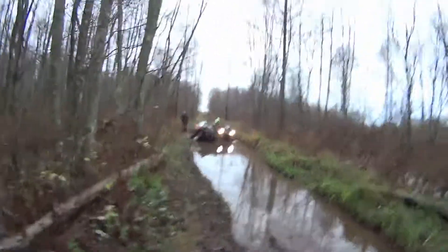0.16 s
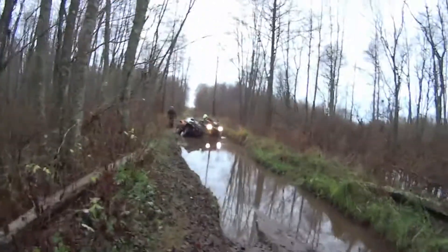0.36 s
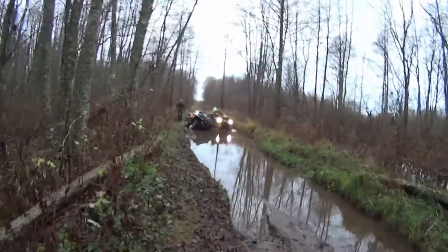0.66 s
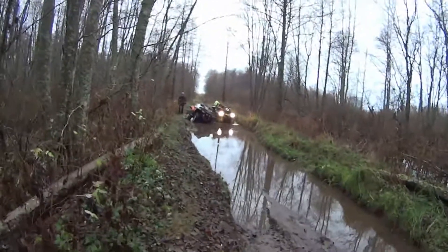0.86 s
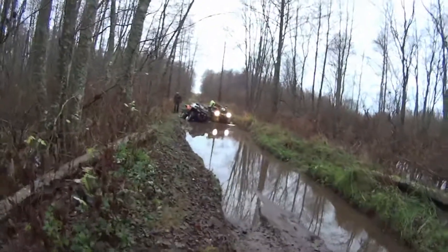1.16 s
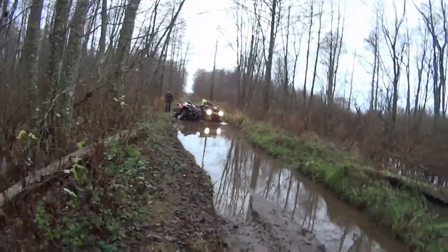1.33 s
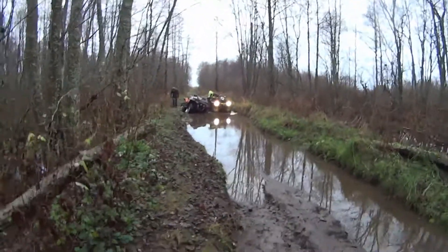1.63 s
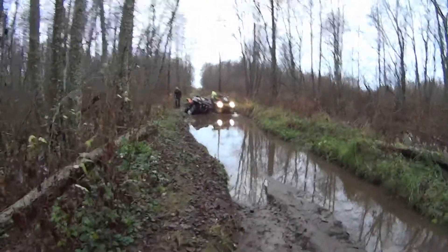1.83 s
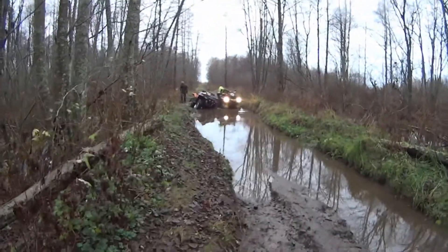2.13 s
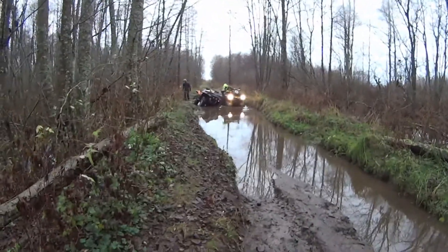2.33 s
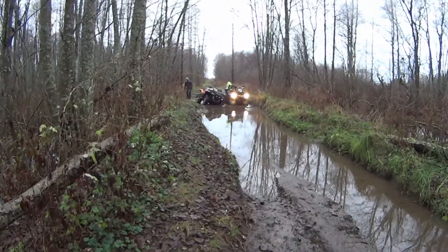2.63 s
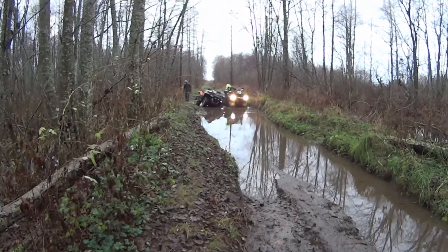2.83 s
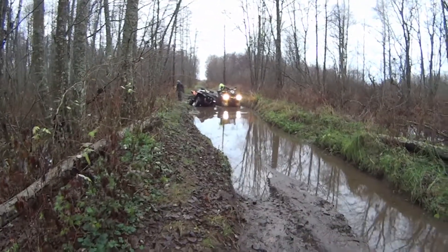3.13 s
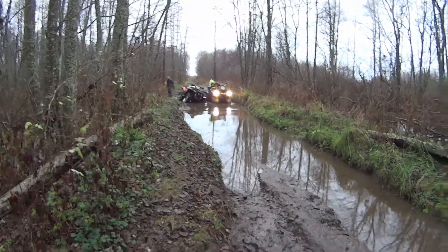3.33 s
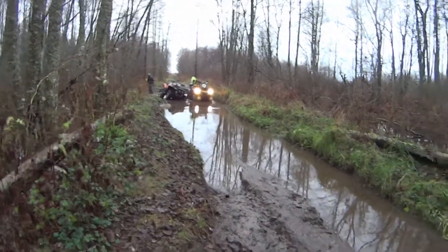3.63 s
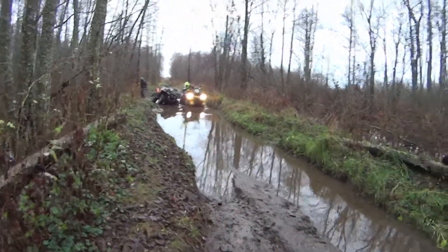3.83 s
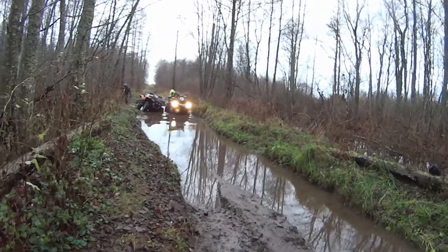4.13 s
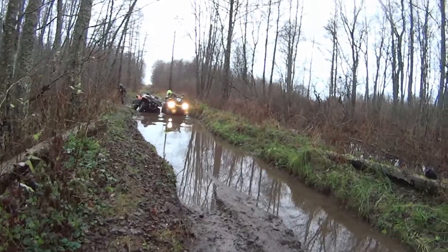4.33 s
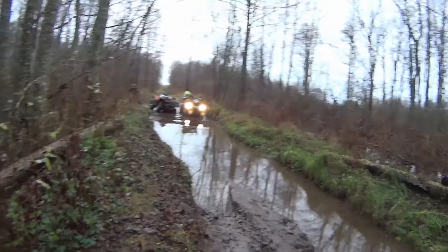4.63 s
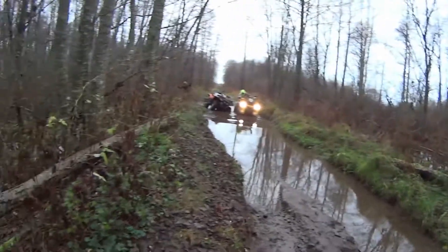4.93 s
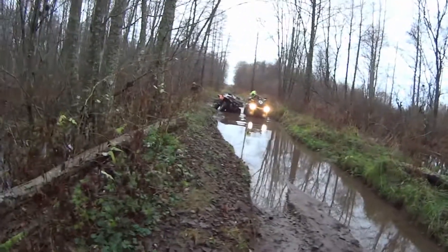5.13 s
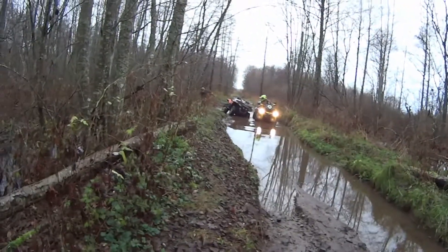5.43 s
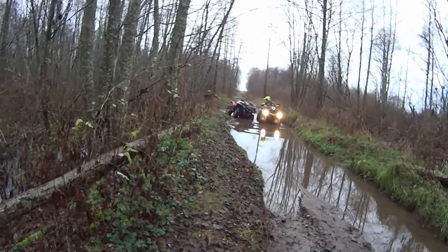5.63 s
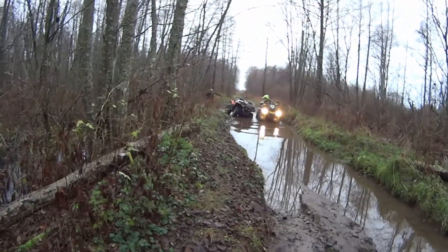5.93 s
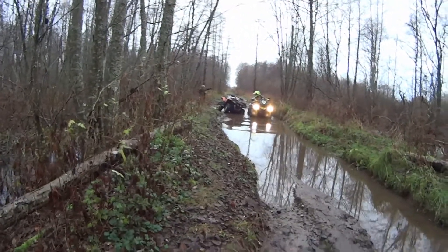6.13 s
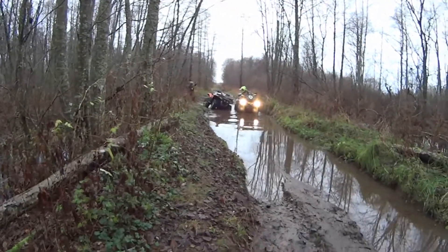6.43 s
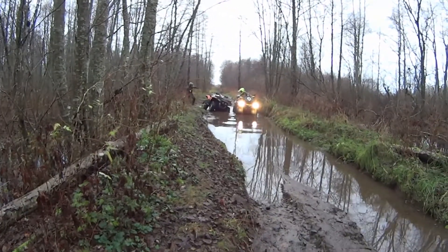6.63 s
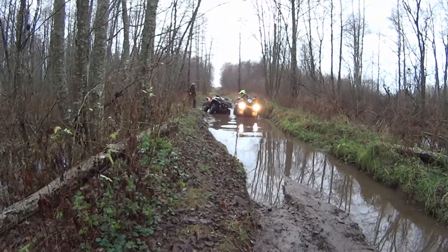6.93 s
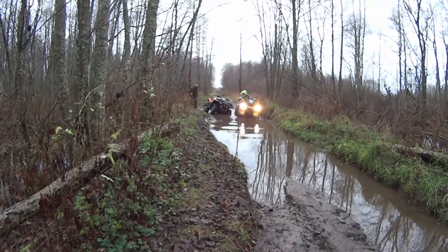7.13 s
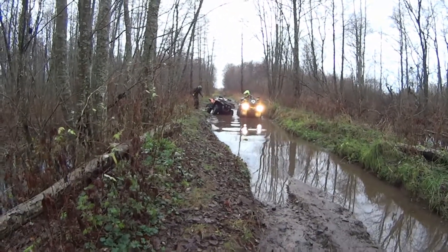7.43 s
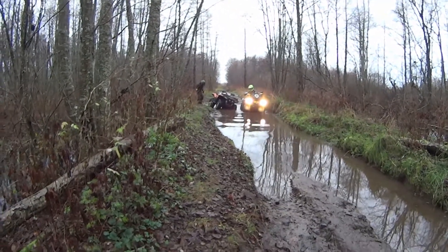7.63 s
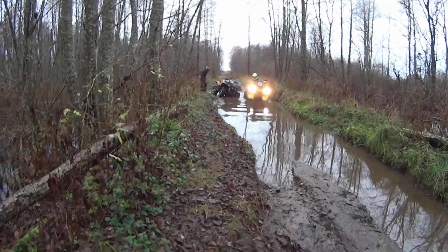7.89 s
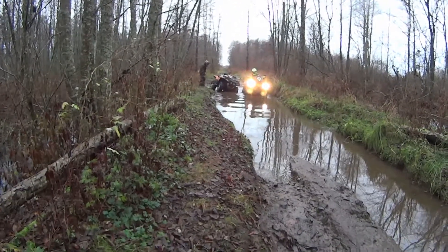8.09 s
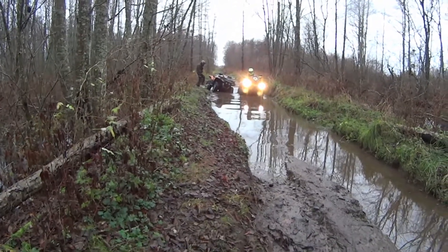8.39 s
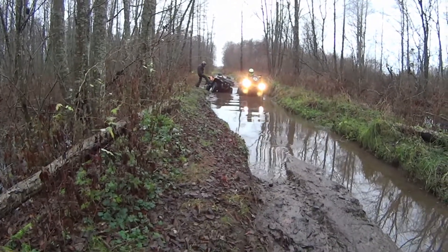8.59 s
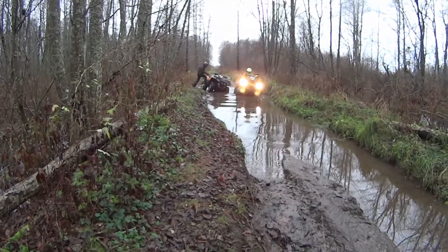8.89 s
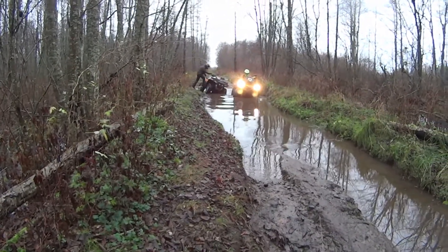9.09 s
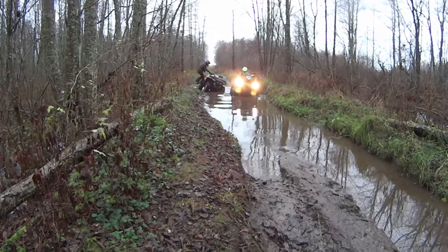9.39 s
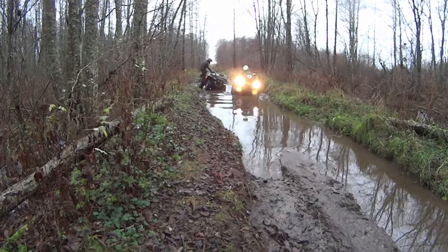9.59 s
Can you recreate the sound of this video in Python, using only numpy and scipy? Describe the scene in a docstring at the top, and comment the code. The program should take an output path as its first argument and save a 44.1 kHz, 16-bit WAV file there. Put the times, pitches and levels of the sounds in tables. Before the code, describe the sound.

Close, steady quad idling and rattling, early handling scrapes and thuds, then a distant engine revving up with growing water spray and splashes.

```python
"""A quad bike idles close by: pitch-gliding exhaust thumps, knocks and clatter after each firing, a noise whir.
A second one wades nearer along a flooded forest track: engine orders over a noise drone, growing spray, splashes.
A hand strokes the camera in the first two seconds (shaped friction noise) and bumps it on and off (damped sines).
Meanwhile the hollow around the microphone closes: a time-varying filter slides its resonance down."""
import sys
import numpy as np
from scipy import signal
from scipy.fft import rfft, irfft, next_fast_len
from scipy.io import wavfile
from scipy.ndimage import uniform_filter1d

SR = 44100
rng = np.random.default_rng(int(sys.argv[2]) if len(sys.argv) > 2 else 0)


def transcribe(u):
    """Save the signal u as a 16-bit wav file named by the first command-line argument.

    u: samples, shape (n,) or (channels, n), limited to [-1, 1]; the rate is SR.
    q: integer samples, one column per channel.
    """
    v = np.clip(np.atleast_2d(u).T, -1, 1)
    q = np.round(v * 32767).astype(np.int16)
    wavfile.write(sys.argv[1], SR, q)


N = 429975
TIME = np.arange(N) / SR


def amp(db):
    """Decibels to amplitude gain."""
    return 10 ** (np.asarray(db) / 20)


def unit(x):
    """Scales to rms 1 (of the mid channel, for a pair)."""
    return x / np.sqrt(np.mean(np.atleast_2d(x)[0] ** 2) + 1e-20)


def curve(rows, t=TIME, axis=1):
    """One column of a time table, linearly interpolated."""
    rows = np.asarray(rows)
    return np.interp(t, rows[:, 0], rows[:, axis])


def read(points, hz):
    """A spectrum, linearly interpolated over log frequency."""
    f, value = np.transpose(points)
    return np.interp(np.log(hz + 1), np.log(f + 1), value)


def shaped(x, points):
    """Zero-phase filter with the given dB spectrum."""
    size = next_fast_len(N)
    gain = amp(read(points, np.fft.rfftfreq(size, 1 / SR)))
    return irfft(rfft(x, size) * gain, size)[..., :N]


def noise(points):
    """Coloured noise as mid and side, the mid at rms 1."""
    return unit(shaped(rng.standard_normal((2, N)), points))


def wander(knots_per_s):
    """Slow random curve of rms 1."""
    knots = rng.standard_normal(4000)
    return unit(np.interp(TIME * knots_per_s, np.arange(len(knots)), knots))


def add(mix, start_s, sound):
    """Mixes a sound in at start_s, or at 0 if that is negative."""
    part = mix[max(round(start_s * SR), 0):][:len(sound)]
    part += sound[:len(part)]


def patter(grains_per_s, spread_db, decay_s):
    """Envelope (rms 1) of random grains of uneven size, each with exponential decay."""
    struck = rng.random(N) < grains_per_s / SR
    hits = struck * amp(spread_db * np.minimum(rng.exponential(1, N), 4.5))
    power = signal.lfilter([1], [1, -np.exp(-1 / (decay_s * SR))], hits ** 2)
    return unit(np.sqrt(power))


def firings(first_firing_s=.086):
    """Times/s at which the idling engine completes a cycle and fires."""
    # idle speed, held until the next row; one firing comes early near 4 s: t/s, rate/(firings/s)
    idle_speed = [(0, 7.353), (.63, 7.585), (1.421, 7.463), (1.957, 7.559), (2.883, 7.456), (3.956, 8.77),
                  (4.07, 7.463), (5.008, 7.117), (5.289, 7.458), (6.764, 7.576), (8.348, 7.468)]
    starts, speeds = np.transpose(idle_speed)
    rate = speeds[np.searchsorted(starts, TIME, "right") - 1]
    cycles = np.cumsum(rate) / SR - first_firing_s * speeds[0]
    return np.interp(np.arange(int(cycles[-1]) + 1), cycles, TIME)


def exhaust(start_hz=30, end_hz=165, glide_s=0.01926, decay_s=0.028, opens_s=0.00407, closes_s=0.041,
            closing_s=.005, suction=0.59, linger=0.043, overtone=.1, thump_db=-28, uneven_db=0.94):
    """Each firing draws in briefly, then thumps until the valve closes; the pipe's note rises as it empties."""
    # radiation of the tailpipe: f/Hz, level/dB
    pipe = [(20, -16), (45, -13), (70, 1.5), (300, -1.5), (600, 11), (1500, -25)]
    t, out, times = np.arange(SR // 7) / SR, np.zeros(N), firings()
    closing = (1 - np.tanh((t - closes_s) / closing_s)) / 2
    fading = np.exp(-(t - opens_s) / decay_s) * closing + linger * (1 - t / t[-1])
    opening = (1 + np.tanh((t - opens_s) / 0.00065)) / 2
    draw = suction * np.exp(-((t - .003) / 0.0012) ** 2)
    for s, (tuning, strength) in zip(times, rng.standard_normal((len(times), 2))):
        hz = (end_hz + (start_hz - end_hz) * np.exp(-t / glide_s)) * (1 + 0.02 * tuning)
        angle = 2 * np.pi * np.cumsum(hz) / SR
        blow = (np.sin(angle) + overtone * np.sin(2 * angle)) * fading * opening
        add(out, s, amp(thump_db + uneven_db * strength) * (blow - draw))
    return shaped(out, pipe)


def rattle(rise_s=0.0022, clatter_decay_s=0.006, clack_spread_db=1.1, uneven_db=1, bright_uneven_db=1.84,
           loose_s=.0005, bright_loose_s=0.001, tick_decay_s=0.0013, steel_gain_db=4.5):
    """Every firing brings the same round of dull case knocks and bright noise clatter: returns both."""
    # blows of one engine cycle: t after firing/s, knock level/dB, clatter level re clack/dB
    cycle = [(-.034, -36.5, -22), (-.0205, -40, -14), (-.0125, -44.5, 3), (-.0035, -33, -16),
             (.001, -45.5, 10), (.004, -30, -19), (.0095, -37.5, -0.5), (0.0152, -35.5, -6),
             (0.0188, -42, -13), (0.0301, -38.5, 5.5), (.035, -53.5, 1), (.040, -40, -15)]
    # modes of the engine case: f/Hz, level/dB, time to peak/s
    case = [(462, -22.5, 0.0062), (589, -23.5, 0.0068), (725, -22, 0.0069), (854, -9, 0.0019),
            (997, -14, .0032)]
    # valve clack ahead of steel_gain_db: t/s, level/dB
    clack_level = [(0, -43.5), (3.8, -41), (7.6, -41), (8.3, -38), (9.75, -43)]
    # sharp valve-gear ticks ahead of steel_gain_db: t/s, level/dB
    ticks = [(.524, -25.5), (3.69, -28), (5.561, -27.5)]
    steel_colour = [(300, -10.5), (1200, -6.5), (2300, 4.0), (3500, -5.5), (5600, 5.5), (8000, 3.0),
                    (11000, 0.0)]  # f/Hz, density/dB per Hz
    t, times = np.arange(SR // 25) / SR, firings()
    knocks, clatter_power = np.zeros(N), np.zeros(N)
    knock = sum(amp(db) * np.sin(2 * np.pi * hz * t) * (t / peak_s) * np.exp(1 - t / peak_s)
                for hz, db, peak_s in case)
    burst = np.exp(-t / clatter_decay_s) * (1 - np.exp(-(t / rise_s) ** 2))
    forces_db = curve(clack_level, times) + clack_spread_db * rng.standard_normal(len(times))
    chance = rng.standard_normal((len(times), len(cycle), 4))
    for s, force_db, draws in zip(times, forces_db, chance):
        for (lag_s, knock_db, bright_db), (a, b, c, d) in zip(cycle, draws):
            add(knocks, s + lag_s + loose_s * c, amp(knock_db + uneven_db * a) * knock)
            burst_db = force_db + bright_db + bright_uneven_db * b
            burst_s = s + lag_s - rise_s / 2 + bright_loose_s * d
            add(clatter_power, burst_s, (amp(burst_db) * burst) ** 2)
    for s, db in ticks:
        add(clatter_power, s, (amp(db) * np.exp(-t / tick_decay_s)) ** 2)
    return knocks, amp(steel_gain_db) * np.sqrt(clatter_power) * noise(steel_colour)


def whir(flutter_db=1.03):
    """The steady rush of chain, belt and fan: coloured noise with a fluttering level."""
    # level ahead of the hollow: t/s, level/dB
    rush_level = [(0, -36.5), (.8, -36), (2.2, -38.5), (4, -38.5), (5.6, -41), (7, -39), (9.75, -36.5)]
    # colour: f/Hz, density/dB per Hz
    rush_colour = [(200, -4.5), (500, -10), (1200, -8.5), (1600, -2.5), (2200, 0), (2650, 3), (3200, -2.5),
                   (5400, -1), (11000, -2)]
    return noise(rush_colour) * amp(curve(rush_level) + flutter_db * wander(90))


def whine(blur=0.0251, roughness=0.54):
    """A thin tone of the idling machine, fuzzy by random pitch and level, that sags and stops."""
    # tone: t/s, f/Hz, level/dB
    tone_track = [(2, 1465, -68), (2.2, 1444, -52), (3.2, 1428, -59), (4.1, 1442, -59.5), (4.8, 1446, -60),
                  (5, 1370, -55), (5.15, 1280, -86)]
    hz = curve(tone_track) * (1 + blur * wander(150))
    tone = np.sin(2 * np.pi * np.cumsum(hz) / SR) * (1 + roughness * wander(60))
    return unit(tone) * amp(curve(tone_track, axis=2))


def pressure(grip_db=-60):
    """How hard the hand rubs: each stroke swells and lets go, over a resting grip."""
    # strokes: t of hardest press/s, level/dB, swell/s, release/s
    stroke_rows = [(.12, -34, 0.069, 0.067), (.205, -32, 0.029, .055), (.61, -36, 0.11, 0.062),
                   (1.22, -30.5, 0.14, 0.085), (1.56, -40, 0.22, .17), (1.855, -29, 0.048, 0.028),
                   (1.98, -37, 0.018, 0.037), (2.08, -36.5, 0.094, .06)]
    strokes = [amp(db) * np.exp(np.minimum((TIME - s) / swell_s, (s - TIME) / release_s))
               for s, db, swell_s, release_s in stroke_rows]
    return np.sqrt(amp(grip_db) ** 2 + np.sum(np.square(strokes), axis=0))


def hand(grain_db=0.2, lumpy_db=2.0, thud_cycles=0.55, body_hz=330, body_db=-5, body_decay_s=0.0037,
         soft_cycles=0.17):
    """Skin sticks and slips on the housing; bumps give a dead thud and a scuff. Returns thuds and friction."""
    # bumps: t/s, thud level/dB, thud f/Hz, scuff level/dB, scuff decay/s
    bumps = [(.004, -19, 168, -17.5, 0.015), (0.214, -32, 59.4, -30, 0.034), (0.417, -19, 41.8, -47, 0.015),
             (.963, -43, 122, -30, 0.0063), (1.135, -18, 170, -34.5, 0.009), (1.217, -10, 212, -35, 0.008),
             (1.368, -45, 150, -23.5, .0018), (1.864, -9.5, 138, -17, .0065),
             (1.881, -22, 100, -24, 0.0033), (1.8887, -18, 41.7, -13.5, 0.0031),
             (2.49, -17, 44.8, -55, .005), (3.04, -25, 42, -55, .005), (5.91, -21, 90, -41, .005),
             (6.099, -16, 98, -36, 0.0049), (7.442, -13.5, 129, -35, 0.0058),
             (7.905, -13.5, 168, -36.5, .005), (9.101, -22, 80, -32, 0.0078)]
    # colour of the rubbing: f/Hz, density/dB per Hz
    rub_colour = [(60, -17), (160, -2.5), (330, -2), (600, -7.5), (1000, -1.5), (1550, -2.5), (2100, -7),
                  (3500, -16), (6000, -9.5), (9000, -29)]
    # colour of the scuffs: f/Hz, density/dB per Hz
    scuff_colour = [(60, -6), (160, 8.5), (360, 1.5), (620, -2.5), (1000, 0.5), (1550, -1.5), (2100, -7),
                    (3500, -18), (6000, -11), (9000, -47)]
    # low rumble of the hand: t/s, level/dB
    rumble_level = [(0, -32.5), (.55, -34), (1.05, -40), (1.75, -33), (2.2, -42.5), (3.6, -50), (6.5, -60)]
    # its colour: f/Hz, density/dB per Hz
    rumble_colour = [(8, 4), (18, -3), (40, 2), (70, -9), (140, -19), (400, -53)]
    t, thuds, scuffs = np.arange(SR // 8) / SR, np.zeros(N), np.zeros(N)
    body = amp(body_db) * np.sin(2 * np.pi * body_hz * t) * np.exp(-t / body_decay_s)
    for s, thud_db, hz, scuff_db, decay_s in bumps:
        hardness = np.clip((scuff_db + 38.5) / 22, 0, 1)  # scuffing bumps start sharply and ring the housing
        onset = 1 - (1 - hardness) * np.exp(-t * hz / soft_cycles)
        push = np.sin(2 * np.pi * hz * t) * np.exp(-t * hz / thud_cycles) * onset
        add(thuds, s, -amp(thud_db) * (push + hardness * body))
        add(scuffs, s, amp(scuff_db) * np.exp(-t / decay_s))
    slips = patter(grains_per_s=680, spread_db=1.0, decay_s=0.0024)
    rub = pressure() * amp(grain_db * wander(120)) * slips
    rumble = amp(curve(rumble_level) + lumpy_db * wander(16))
    return thuds, noise(rub_colour) * rub + noise(scuff_colour) * scuffs + noise(rumble_colour) * rumble


def far_quad(waver=0.0057, fading_db=3, orders_db=-1.5, echo_db=0):
    """Engine orders fade in and out among the trees; a noise drone is their blurred echo. Returns both."""
    # engine speed: t/s, rate/(cycles/s)
    far_speed = [(0, 20.5), (2.5, 21), (4.3, 21.5), (6.6, 21), (7.4, 22), (7.9, 23.5), (8.4, 26), (9, 22),
                 (9.4, 24.5), (9.75, 24.5)]
    # level ahead of orders_db and echo_db: t/s, level/dB
    far_level = [(0, -46), (2.5, -45), (5.5, -46), (7.2, -45.5), (8.2, -43), (9.75, -41.5)]
    # orders: multiple of the cycle rate, relative level/dB
    far_orders = [(3, -1), (4, -13), (5, 6), (6, -17), (7, -19), (8, 1), (9, -15), (10, -6), (11, -27),
                  (12, -8.5), (13, -25), (16, -23)]
    # colour of the drone: f/Hz, density/dB per Hz
    drone_colour = [(20, -5), (45, -3.5), (75, 1), (120, -1), (200, -1), (290, -14.5), (420, -25),
                    (900, -31), (3000, -60)]
    turns = np.cumsum(curve(far_speed) * (1 + waver * wander(9))) / SR
    lines = np.zeros(N)
    for order, db in far_orders:
        fading = amp(db + fading_db * wander(7.7))
        lines += fading * np.sin(2 * np.pi * (round(order) * turns + rng.random()))
    level = amp(curve(far_level))
    return amp(orders_db) * level * unit(lines), amp(echo_db) * level * noise(drone_colour)


def spray(drops_db=4, surge_db=1):
    """Water thrown by the wheels: drops patter over a hiss, and the level surges at random."""
    # level ahead of the hollow: t/s, level/dB
    spray_level = [(0, -51), (3, -50), (6, -46), (7.3, -50.5), (8.1, -40), (8.8, -36.5), (9.4, -34.5),
                   (9.75, -32.5)]
    # colour: f/Hz, density/dB per Hz
    spray_colour = [(200, -32), (600, -11.5), (1100, -13.5), (1600, 0), (2200, 4.5), (3000, -6.5),
                    (5000, -1), (11000, -2)]
    drops = amp(drops_db) * patter(grains_per_s=1900, spread_db=1.5, decay_s=0.00053)
    water = unit(noise(spray_colour) * np.hypot(1, drops))
    return water * amp(curve(spray_level) + surge_db * wander(14))


def splashes(rise_s=0.0029, width_hz=500):
    """Larger slaps of water: low-passed noise modulates a sine, a short burst around each slap's note."""
    # slaps: t/s, level/dB, f/Hz
    slaps = [(3.935, -32, 3450), (8.259, -34, 2380), (8.939, -29, 2160), (9.081, -41, 1860),
             (9.263, -30, 2040), (9.452, -28, 2060), (9.481, -22.5, 2640), (9.713, -34, 2200)]
    t, out = np.arange(SR // 12) / SR, np.zeros(N)
    envelope = (t / rise_s) * np.exp(1 - t / rise_s)
    for s, db, hz in slaps:
        pole = np.exp(-np.pi * width_hz / SR)
        fizz = unit(signal.lfilter([1], [1, -pole], rng.standard_normal(len(t))))
        add(out, s, amp(db) * fizz * np.sin(2 * np.pi * hz * t) * envelope)
    return out


def hollow(x, width_hz=230, ring_hz=3950, ring_width_hz=80, follow=0.45, peak_db=4, patchy_db=1.5,
           dip_db=5, dip_at=0.67, open_db=5.5, shut_db=7, ring_open_db=9, ring_shut_db=6):
    """The hollow at the microphone rings; as it closes, its note and the treble dip slide down together."""
    # resonance of the hollow between hand and microphone: t/s, f/Hz
    note_track = [(0, 4270), (.25, 4200), (.45, 3780), (.9, 2530), (1.2, 2600), (1.58, 2740), (1.78, 2130),
                  (2.1, 2066), (9.75, 2122)]
    # treble response with the hollow closed: f/Hz, level/dB
    port = [(3000, 1.5), (4600, 3.5), (5500, 3.5), (6400, -2.5), (7200, -7.5), (7900, -15), (8700, -13.5),
            (9150, -3.5), (10000, -7.5), (11000, -14.5)]
    open_colour = [(1000, 3), (2000, -3.0), (3200, 6.0), (6000, -1.5), (9000, 2.0), (11000, -7)]  # f/Hz, dB
    hz, t, z = signal.stft(x, SR, nperseg=1024, noverlap=512)
    hz = hz[:, None]
    note = curve(note_track, t)
    stretch = (note / note_track[-1][1]) ** follow
    opening = np.clip((stretch - 1) * 10, 0, 1)
    height_db = shut_db + (open_db - shut_db) * opening
    ring_db = ring_shut_db + (ring_open_db - ring_shut_db) * opening
    field_db = read(port, hz / stretch)
    field_db += height_db / (1 + ((hz - note) / (width_hz * stretch ** 2)) ** 2)
    # ring of the housing
    ring_offset = (hz - ring_hz * (1 + 0.064 * opening)) / (ring_width_hz * (1 + 0.86 * opening))
    field_db += ring_db / (1 + ring_offset ** 2)
    # closed, it rings more sharply
    field_db += peak_db * (1 - opening) / (1 + ((hz - note) / 25) ** 2)
    # open, it cancels a band below its note
    field_db -= dip_db * opening / (1 + ((hz / note - dip_at) / 0.35) ** 2)
    field_db += opening * read(open_colour, hz)
    # the hiss flutters
    patches = uniform_filter1d(rng.standard_normal(field_db.shape), size=7, axis=0)
    patches = uniform_filter1d(patches, size=5, axis=1)
    field_db += patchy_db * patches / patches.std()
    return signal.istft(z * amp(field_db), SR, nperseg=1024, noverlap=512)[1][:, :N]


def scene():
    """Close, low sounds sit in the middle; the diffuse ones spread to both sides."""
    # stereo width of the diffuse sound: f/Hz, side re mid/dB
    width = [(50, -14.5), (130, -10.5), (250, -5), (400, 4.5), (700, 3.5), (1400, -4.5), (2100, -7),
             (3000, -9), (5300, -13.5), (6800, -6), (8000, -4), (9200, -6), (11000, -0.5)]
    knocks, clatter = rattle()
    orders, drone = far_quad()
    thuds, friction = hand()
    mid, side = hollow(whir() + clatter + spray()) + drone + friction
    mid = mid + exhaust() + knocks + whine() + orders + thuds + splashes()
    side = shaped(side, width)
    side = side - shaped(thuds, [(40, -18), (150, -17), (350, 2)])  # the hand bumps on the right
    lean_db = np.interp(TIME, [1, 1.8, 2.5, 7, 9.75], [0.64, 0.33, 0.58, 0.5, 0.93])  # left over right
    return np.array([(mid + side) * amp(lean_db / 2), (mid - side) * amp(-lean_db / 2)])


def record(dry, edge_hz=11120):
    """The camera's band limit: a linear-phase low-pass."""
    lowpass = signal.firwin(801, edge_hz, window=("kaiser", 9), fs=SR)
    return signal.oaconvolve(dry, lowpass[None], "same")


dry = scene()
out = record(dry)
transcribe(out)
```